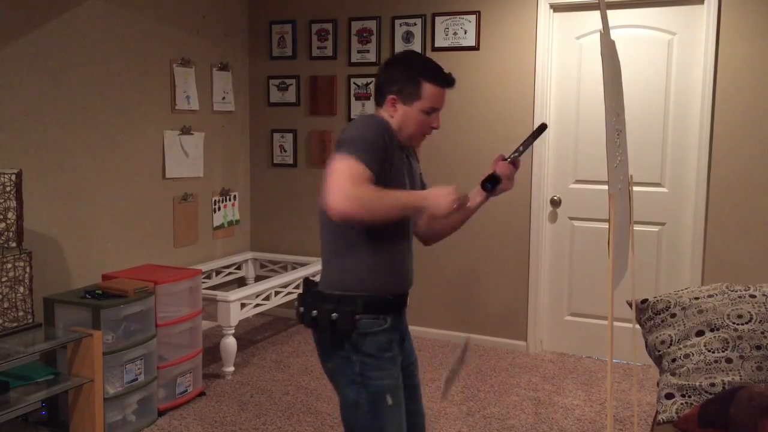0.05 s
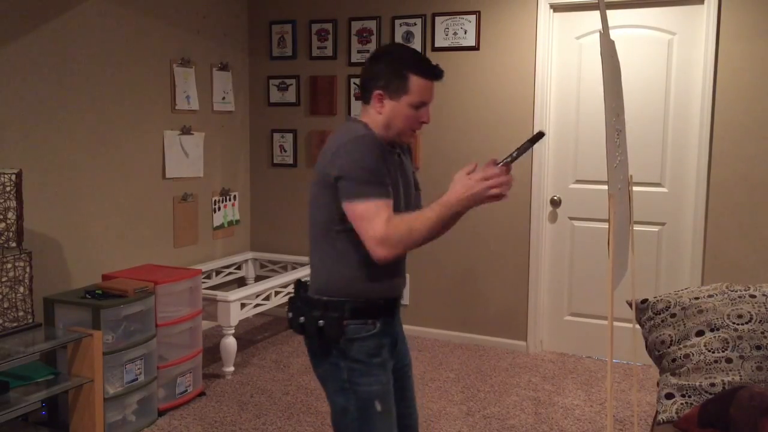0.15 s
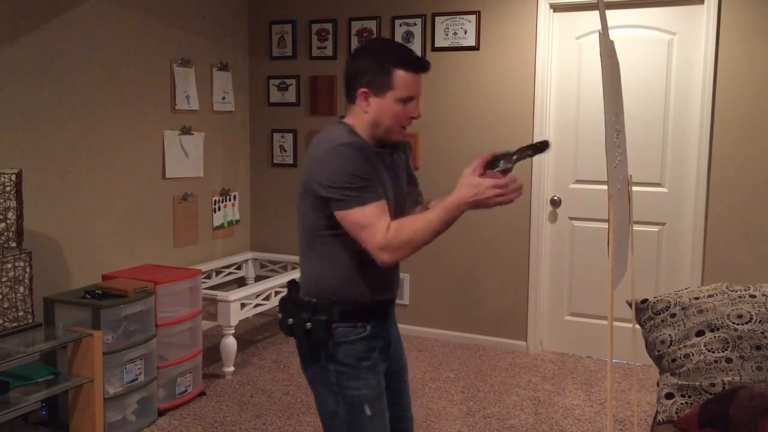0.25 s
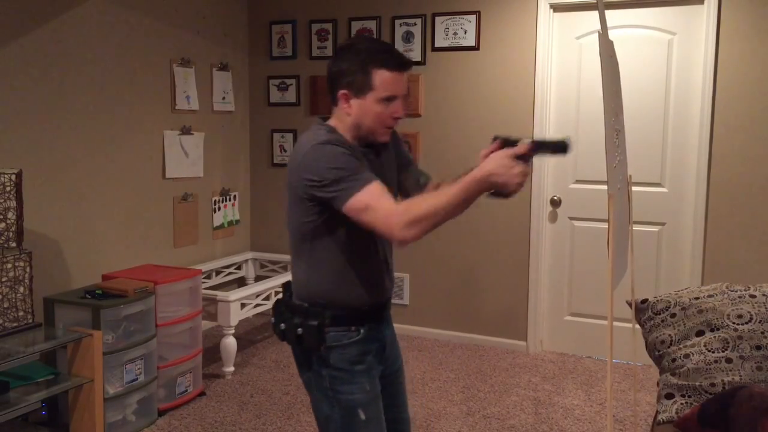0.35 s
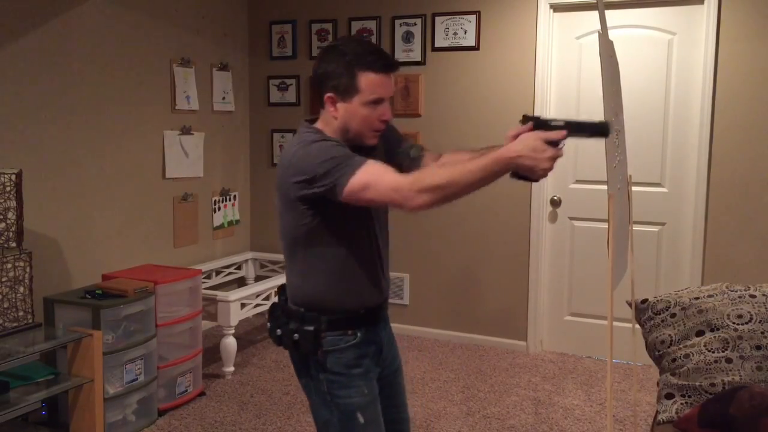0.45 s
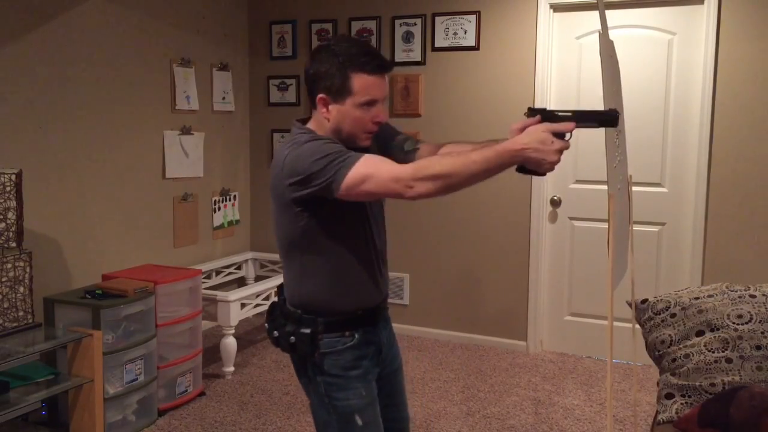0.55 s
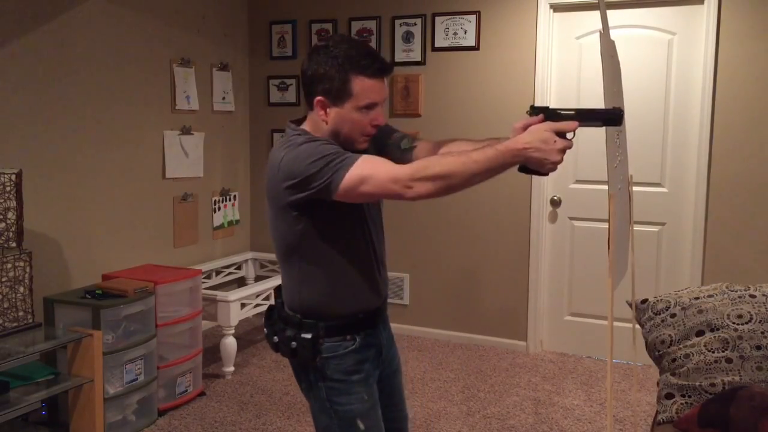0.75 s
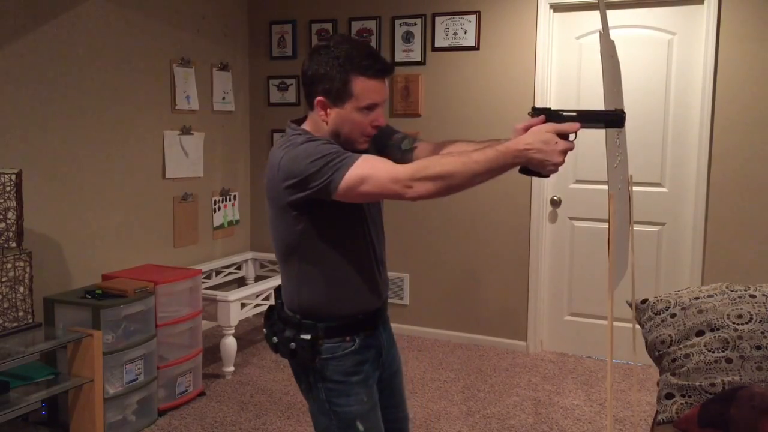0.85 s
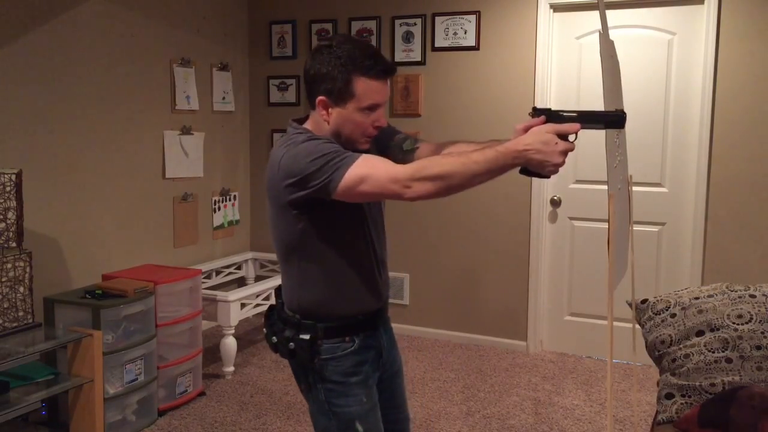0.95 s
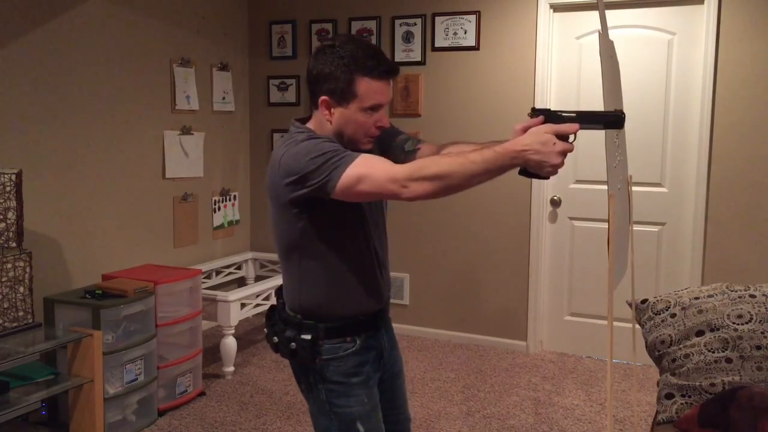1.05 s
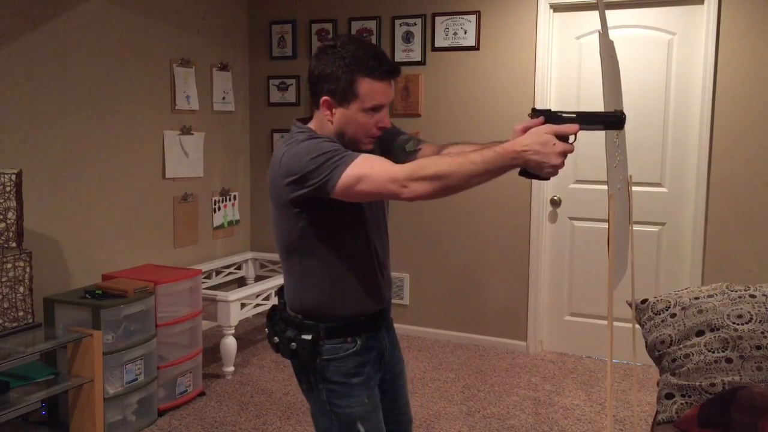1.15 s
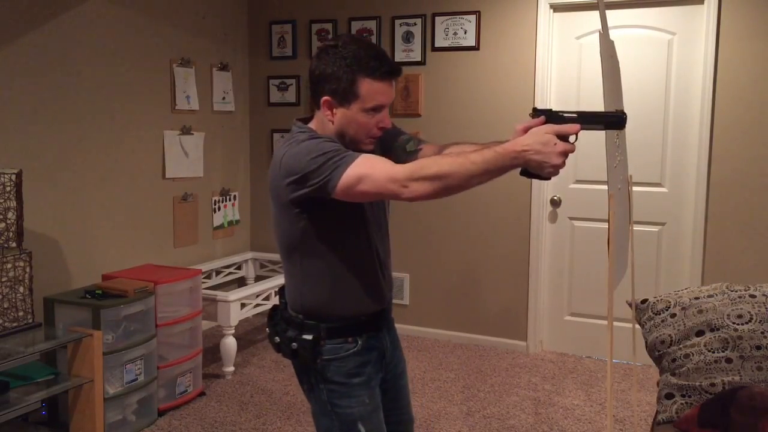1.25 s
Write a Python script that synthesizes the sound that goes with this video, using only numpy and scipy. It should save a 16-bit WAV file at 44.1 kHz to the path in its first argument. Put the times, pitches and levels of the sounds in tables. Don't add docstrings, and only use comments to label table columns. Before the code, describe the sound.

Fast pistol reload: a small metallic snap, a loud magazine clack, then light rattling thuds on carpet

```python
import sys
import numpy as np
from scipy import signal
from scipy.fft import rfft, irfft
from scipy.io import wavfile

SR = 44100
rng = np.random.default_rng(int(sys.argv[2]) if len(sys.argv) > 2 else 0)


def int16_out(signal):
    q = np.round(np.clip(np.atleast_2d(signal).T, -1, 1) * 32767)
    wavfile.write(sys.argv[1], SR, q.astype(np.int16))


def gain_from_db(level_db):
    decades = np.asarray(level_db, float) / 20
    return 10 ** decades


N = 57330
TIME = np.arange(N) / SR


def highpass(x, order, cut_hz):
    return signal.sosfilt(signal.butter(order, cut_hz, "high", fs=SR, output="sos"), x)


def colour(x, points):
    p = np.array(points, float)
    hz = np.maximum(np.fft.rfftfreq(4096, 1 / SR), 1)
    db = np.interp(np.log(hz), np.log(p[:, 0]), p[:, 1], left=p[0, 1] - 15)
    cepstrum = irfft(np.log(gain_from_db(db)))
    cepstrum[1:2048] *= 2
    cepstrum[2049:] = 0
    h = irfft(np.exp(rfft(cepstrum)))[:2048]
    return signal.fftconvolve(x, h / np.sqrt(np.sum(h ** 2)))[:len(x)]


def resonate(x, hz, t60):
    pole = np.exp(2j * np.pi * hz / SR - np.log(1000) / (t60 * SR))
    return signal.lfilter([1], [1, -pole], x)


def waver():
    drift_s = 0.015
    return np.interp(TIME / drift_s, np.arange(400), rng.standard_normal(400))


def ring(x, modes):
    wobble_db, wobble_rad = 2, 0.35
    out = np.zeros(N)
    for hz, db, t60 in modes:
        level = gain_from_db(db + wobble_db * waver())
        turn = np.exp(1j * wobble_rad * waver())
        tone = resonate(x * rng.standard_normal(N), hz, t60)
        out += level * (tone * turn).imag
    return out


def contact(rows):
    attack_share = 0.19
    strength = np.zeros(N)
    for start, db, rattle_s, *_ in rows:
        age = np.maximum(TIME - start, 0) / rattle_s
        strength += gain_from_db(db) * (1 - np.exp(-age / attack_share)) * np.exp(-age)
    return strength


def grains():
    grain_db, biggest = 1, 2.5
    sizes = np.minimum(rng.exponential(size=N // 24 + 1), biggest)
    chatter = gain_from_db(grain_db * np.repeat(sizes, 24)[:N])
    return chatter / np.sqrt(np.mean(chatter ** 2))


def strike(rows, crack_points, modes, relative=True):
    ring_db = -31
    rough = grains()
    crack = colour(contact(rows) * rough * rng.standard_normal(N), crack_points)
    ring_rows = [(s, r_db + db * relative, rattle_s) for s, db, rattle_s, r_db in rows]
    return crack + gain_from_db(ring_db) * ring(contact(ring_rows) * rough, modes)


def thud(rows, modes, push_s):
    cut_share, spot_cycles = 0.87, 9.6
    out = np.zeros(N)
    for start, db, spot_hz, spot_db in rows:
        push = -gain_from_db(db) * np.sin(np.pi * np.clip((TIME - start) / push_s, 0, 1))
        push = highpass(push, 2, cut_share * spot_hz)
        spot = (spot_hz, spot_db, spot_cycles / spot_hz)
        for hz, mode_db, t60 in modes + [spot]:
            out += gain_from_db(mode_db) * resonate(push, hz, t60).imag
    return out / (push_s * SR)


def tuned(pitches, rings):
    return [(hz, db, t60) for hz, (db, t60) in zip(pitches, rings)]


# start in seconds, crack level in dB, rattle in seconds, ring in dB relative to the crack.
MOUTH_HITS = [
    (.2005, -4, 0.0041, -0.5),
    (.205, -8.5, 0.0054, -1.5),
    (.211, -17.5, 0.009, 0),
]
# frequency in Hz, level in dB.
MOUTH_CRACK = [(240, -70.5), (400, -28.5), (1260, -24.5), (1610, -10.5), (2030, -18), (2840, -4.5),
               (3410, -12.5), (9070, -10), (15500, -14.5)]
# frequency in Hz, level in dB, time to fall 60 dB in seconds.
MOUTH_MODES = [(1600, -1, .03), (1690, 0, .035), (2260, -8, .035), (2830, 0, .045), (4010, -4, .025),
               (4300, -5, .03), (5480, -6, .02)]
# start in seconds, crack level in dB, rattle in seconds,
# ring in dB relative to the crack.
SEAT_HITS = [
    (.215, -7, 0.0027, 2),
    (.2213, 3.5, .0015, -10),
    (.2248, -3, 0.0024, -4.5),
    (.228, -6, 0.0039, -2.5),
    (.236, -10, 0.0028, -8.5),
    (.246, -12.5, 0.0061, -0.5),
    (.268, -16.5, 0.022, -4),
    (.293, -21.5, 0.0048, 2),
]
# frequency in Hz, level in dB.
HOME_CRACK = [(400, -34), (1470, -18), (2250, -5.5), (3110, -11.5), (4250, -8), (5730, -10.5), (6780, -15),
              (9500, -12.5), (15500, -19.5)]
GRIP_HZ = [1635, 1690, 1866, 2035, 2225, 2263, 2310, 2402, 2800, 4215, 4410, 5636, 5823]
# level in dB, time to fall 60 dB in seconds.
GRIP_RING = [(-6.5, .05), (-10.5, .05), (0, 0.12), (-4, 0.14), (-3, .08), (2.5, .2), (1, 0.15), (-9.5, .2),
             (-3.5, 0.081), (-1.5, .05), (-4, .05), (-8, .12), (-8.5, .14)]


def magazine_seating():
    mouth = strike(MOUTH_HITS, MOUTH_CRACK, MOUTH_MODES)
    home = strike(SEAT_HITS, HOME_CRACK, tuned(GRIP_HZ, GRIP_RING))
    return highpass(mouth + home, 4, 620)


# start in seconds, level in dB, pitch in Hz of the spot struck, level of that pitch in dB.
PALM_HITS = [
    (.203, -33.5, 116, 0.5),
    (.218, -34, 65, -0.5),
    (.222, -27, 534, 11),
    (.2925, -14, 467, 0.5),
    (.3, -44, 81.7, 0),
]
# frequency in Hz, level in dB, time to fall 60 dB in seconds.
PALM_MODES = [(540, -30.5, 0.04)]


def palm_slap():
    return thud(PALM_HITS, PALM_MODES, push_s=0.0017)


# start in seconds, crack level in dB, rattle in seconds, ring level in dB.
BOUNCES = [(.346, -13.5, 0.0049, -18), (.353, -21, 0.013, -24.5), (.364, -20.5, 0.011, -23),
           (.378, -26.5, 0.036, -26.5), (.549, -41, 0.01, -45), (.555, -37.5, .012, -37),
           (.5615, -32, 0.01, -33.5), (.572, -39, 0.007, -43), (.58, -37, 0.023, -41.5),
           (.72, -56, 0.026, -35), (.738, -40.5, 0.0075, -28), (.742, -51, 0.011, -56),
           (.752, -37.5, 0.029, -42), (.8305, -29.5, 0.0027, -20), (.836, -35, 0.0088, -38.5),
           (.843, -39, 0.0051, -32), (.851, -38, 0.0089, -46), (.862, -41.5, 0.012, -34),
           (.873, -51, 0.0082, -58), (.91, -56, 0.0069, -42), (.94, -69, 0.016, -54),
           (.97, -75, 0.012, -54.5), (.995, -70, 0.01, -50)]
# frequency in Hz, level in dB.
BOUNCE_CRACK = [(1400, -25), (1950, -6), (2900, -3), (4200, -8.5), (5300, -10.5), (6200, 1), (7400, -8.5),
                (8800, -5), (15500, -13)]
SHELL_HZ = [1760, 1870, 1955, 1990, 2010, 2085, 2250, 2470, 2865, 3400, 4015]
# level in dB, time to fall 60 dB in seconds.
SHELL_RING = [(-5, 0.052), (-3, 0.11), (-2.5, 0.078), (-1, 0.14), (-4, 0.17), (-6.5, 0.18), (-6, 0.2),
              (-23, 0.074), (-5, 0.056), (-17, 0.073), (-12, 0.062)]
SHELL_HIGH_HZ = [5840, 5890, 5960, 6230, 6340, 6490, 6690, 8540, 9000]
# level in dB, time to fall 60 dB in seconds.
SHELL_HIGH_RING = [(-18.5, 0.22), (-8.5, 0.18), (-14.5, 0.32), (-20, 0.067), (-27, 0.067), (-25, .15),
                   (-8, 0.05), (-14, 0.051), (-7, 0.05)]


def falling_shell():
    rest_s, choke_s, choked_db = 1.015, 0.012, -24
    modes = tuned(SHELL_HZ, SHELL_RING) + tuned(SHELL_HIGH_HZ, SHELL_HIGH_RING)
    shell = strike(BOUNCES, BOUNCE_CRACK, modes, relative=False)
    choke = np.exp(-np.maximum(TIME - rest_s, 0) / choke_s)
    return highpass(shell * np.maximum(choke, gain_from_db(choked_db)), 4, 1350)


# start in seconds, level in dB, pitch in Hz of the spot struck, level of that pitch in dB.
LANDINGS = [(.346, -11.5, 470, -4.5), (.349, -13, 199, -2), (.377, -22.5, 285, -8), (.548, -22, 313, -17.5),
            (.553, -34, 300, -2), (.701, -36, 90, 0.5), (.713, -43, 200, 9), (.7345, -24.5, 330, -4.5),
            (.7405, -31, 166, 3), (.746, -35.5, 160, 3.5), (.753, -34, 157, -2), (.765, -34, 282, 7.5),
            (.778, -33, 166, 3), (.79, -38.5, 286, 5), (.829, -23.5, 200, 3), (.842, -32, 400, -6),
            (.851, -36.5, 222, -3), (.871, -35.5, 220, 2.5), (.996, -51, 186, 4), (1.112, -48.5, 300, -13),
            (1.175, -52, 150, -2)]
# frequency in Hz, level in dB, time to fall 60 dB in seconds.
FLOOR_MODES = [(160, -16.5, 0.11), (186.5, -12.5, 0.096), (240, -11, 0.078), (300, -7, 0.024),
               (396, -9.5, 0.024), (588, -15.5, 0.043)]


def floor_thuds():
    return -thud(LANDINGS, FLOOR_MODES, push_s=0.0013)


# start in seconds, level in dB, rattle in seconds.
SCUFFS = [
    (.346, -27.5, 0.0083),
    (.362, -53, 0.0065),
    (.549, -47.5, 0.012),
    (.7015, -48, 0.0068),
    (.708, -43, .004),
    (.714, -64, 0.0057),
    (.724, -58, 0.0097),
    (.737, -51, 0.0021),
    (.83, -51, 0.0073),
]
# frequency in Hz, level in dB.
SCUFF_TONE = [(400, -26.5), (800, 0), (1300, -3), (2000, -2), (2800, -11), (4000, -17), (8000, -28)]


def carpet_scuffs():
    return colour(contact(SCUFFS) * grains() * rng.standard_normal(N), SCUFF_TONE)


# start in seconds, crack level in dB, rattle in seconds, ring in dB relative to the crack.
POUCH_HITS = [
    (.045, -10, 0.0018, -8),
    (.049, -21.5, 0.003, -9.5),
    (.0565, -20, 0.0035, -2.5),
    (.062, -33, .004, -6.5),
    (.071, -32, 0.003, -1),
    (.081, -31.5, .003, -7.5),
    (.089, -40, 0.011, -6.5),
    (.112, -36.5, 0.0068, -6),
]
# start in seconds, crack level in
# dB, rattle in seconds, ring in dB relative to the crack.
LATE_TICKS = [
    (.995, -58, 0.0044, -6),
    (1.112, -62, 0.0048, -6),
    (1.279, -64, 0.0046, 7.5),
    (1.291, -55.5, 0.0036, 4),
]
# frequency in Hz, level in dB.
POUCH_CRACK = [(400, -29), (1000, -7), (1900, -20), (2900, 0), (4500, -7.5), (6000, -7.5), (10500, -15.5),
               (13000, -8), (15500, -22)]
# start in seconds, crack level in dB, rattle in seconds, ring in dB relative to the crack.
RELEASE = [
    (-.04, -35.5, 0.066, -8.5),
    (.027, -32.5, 0.011, -9.5),
]
# frequency in Hz, level in dB.
RELEASE_CRACK = [(88, -55), (150, -31.5), (860, -16), (1830, 3), (2020, -10.5), (3350, -7), (4840, -13.5),
                 (11400, -21), (15500, -25.5)]
# frequency in Hz, level in dB, time to fall 60 dB in seconds.
POUCH_MODES = [(1050, -10.5, 0.029), (1580, -4.5, 0.14), (1900, -2.5, 0.041), (2153, 0.5, 0.073),
               (2760, -2, .05), (3370, -11.5, .06), (5080, -13.5, 0.027), (5960, -6, .03)]


def handling():
    pull = strike(POUCH_HITS + LATE_TICKS, POUCH_CRACK, POUCH_MODES)
    release = strike(RELEASE, RELEASE_CRACK, POUCH_MODES[:4])
    return pull + release


# start in seconds, level in dB, pitch in Hz of the spot pulled, level of that pitch in dB.
TUGS = [
    (0.0, -54, 240, -5.5),
    (.044, -50, 240, -5.5),
]
# frequency in Hz, level in dB, time to fall 60 dB in seconds.
BELT_MODES = [(229.9, 0.00043, 0.36)]


def belt_tugs():
    return thud(TUGS, BELT_MODES, push_s=0.0013)


# band centre in Hz, level in dB, time to fall 60 dB in seconds.
ROOM_BANDS = [(128.2, -3, 0.46), (240, -6.5, .3), (360, -6.5, 0.16), (554, -7, 0.34), (897.5, -6, 0.32),
              (2300, -7.5, 0.5), (5400, -9.5, 0.52), (9300, -10, 0.16), (15000, -15.5, 0.083)]


def room(x):
    onset_s, rise_s = 0.003, 0.006
    t = np.arange(SR // 2) / SR
    build_up = np.clip((t - onset_s) / rise_s, 0, 1)
    tail = np.zeros(len(t))
    for hz, db, t60 in ROOM_BANDS:
        band = signal.butter(2, [hz / 1.5, min(hz * 1.5, 20000)], "band", fs=SR, output="sos")
        echoes = signal.sosfilt(band, rng.standard_normal(len(t)))
        fade = gain_from_db(-60 * t / t60) * build_up
        tail += gain_from_db(db) * echoes * fade / np.sqrt(np.sum(fade ** 2))
    return signal.fftconvolve(x, tail)[:N]


# frequency in Hz, level in dB.
HUM_TONE = [(15, -40.5), (25, -18), (119, -3.5), (253, -10), (445, -17.5), (567, -16.5), (1110, -21.5),
            (2490, -23.5), (15500, -34)]


def hum():
    hum_db, rumble_db = -66.5, -68
    rumble_hz, rumble_width_hz = 62.1, 6.7
    air = colour(rng.standard_normal(2 * N), HUM_TONE)[N:]
    peak = signal.iirpeak(rumble_hz, rumble_hz / rumble_width_hz, fs=SR)
    rumble = signal.lfilter(*peak, rng.standard_normal(2 * N))[N:]
    return air * gain_from_db(hum_db) / np.std(air) + rumble * gain_from_db(rumble_db) / np.std(rumble)


def scene():
    shell_wet_db, soft_wet_db = -3.5, -3
    shell = falling_shell()
    others = magazine_seating() + floor_thuds() + carpet_scuffs() + handling()
    soft = palm_slap() + belt_tugs()
    echoes = room(others + gain_from_db(shell_wet_db) * shell + gain_from_db(soft_wet_db) * soft)
    return (others + shell + soft + echoes + hum())[None]


def low_pass(x):
    return signal.sosfilt(signal.butter(12, 16470, fs=SR, output="sos"), x)


def record(dry):
    ceiling, knee, top_hz = 0.72, 4, 15200
    held = dry / (1 + np.abs(dry / ceiling) ** knee) ** (1 / knee)
    treble_cut = signal.ellip(8, 0.2, 60, top_hz, fs=SR, output="sos")
    return low_pass(signal.sosfilt(treble_cut, held))


dry = scene()
out = record(dry)
int16_out(out)
```